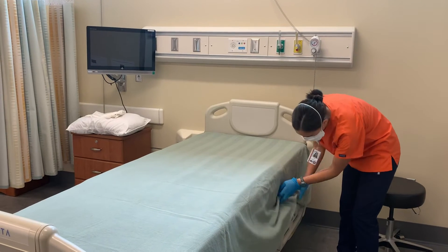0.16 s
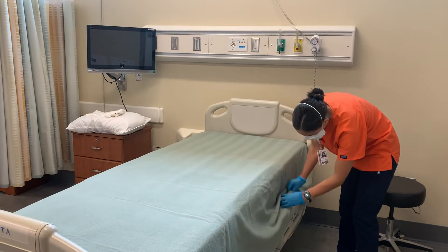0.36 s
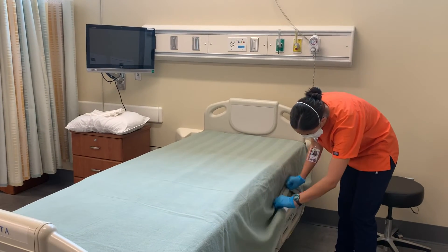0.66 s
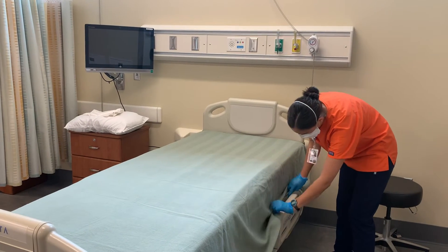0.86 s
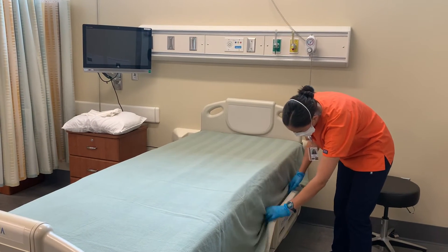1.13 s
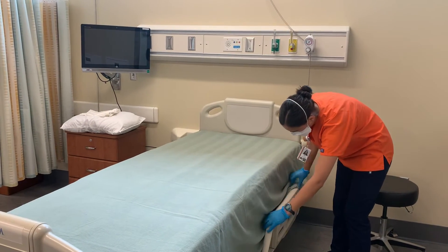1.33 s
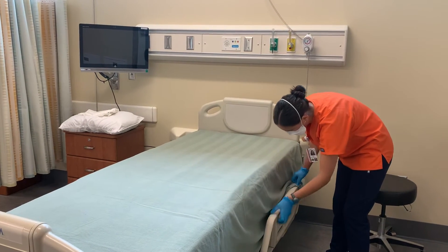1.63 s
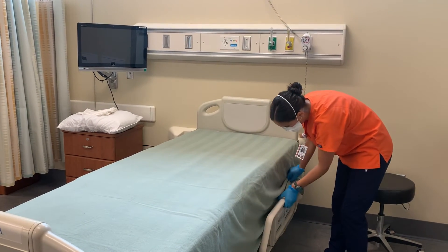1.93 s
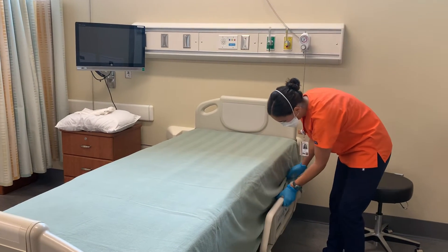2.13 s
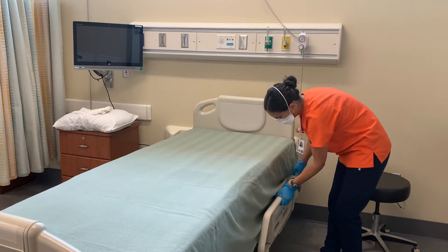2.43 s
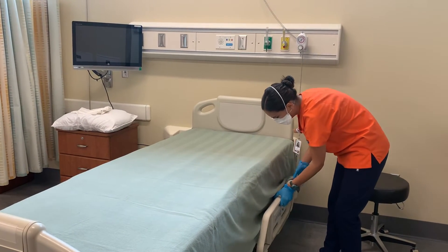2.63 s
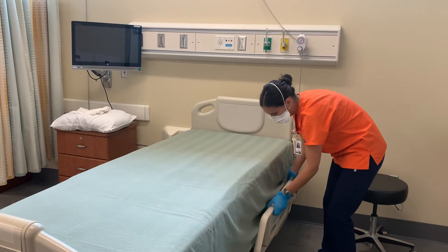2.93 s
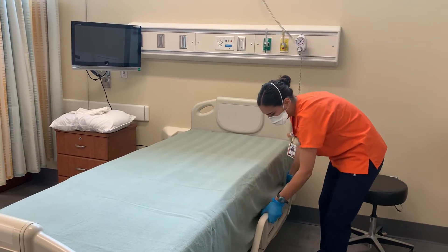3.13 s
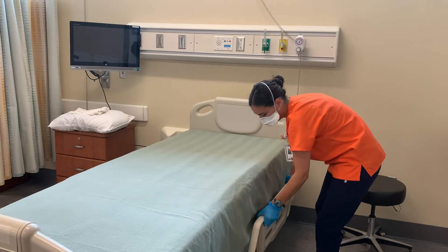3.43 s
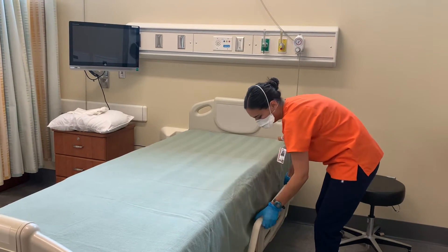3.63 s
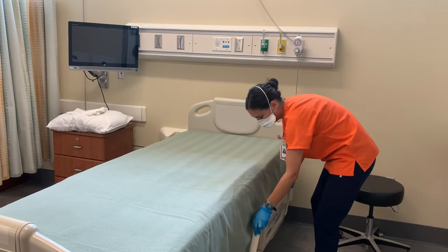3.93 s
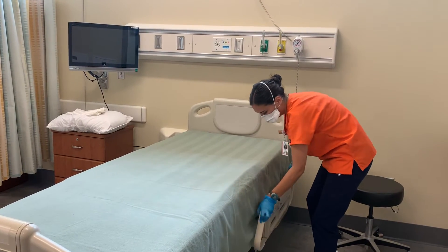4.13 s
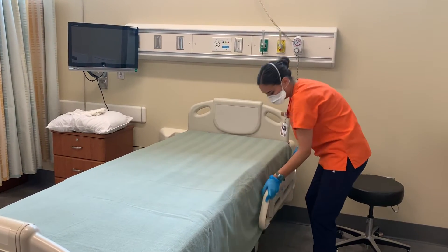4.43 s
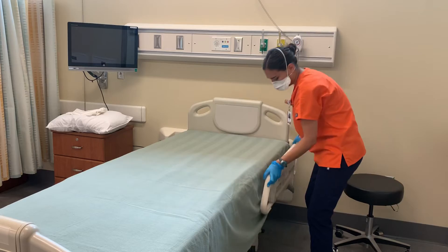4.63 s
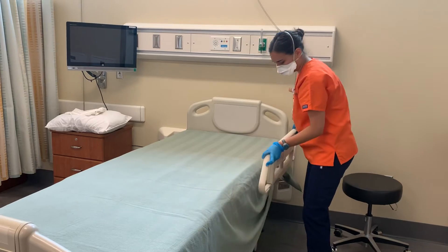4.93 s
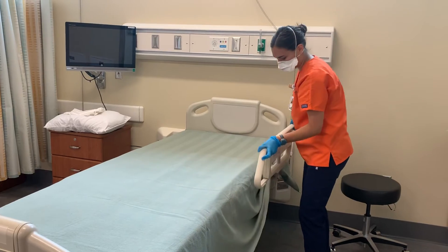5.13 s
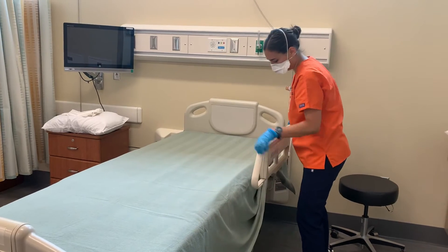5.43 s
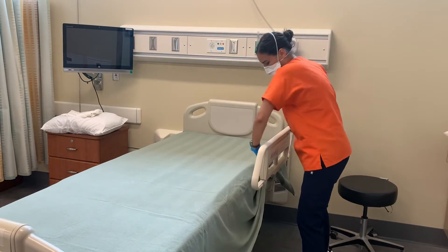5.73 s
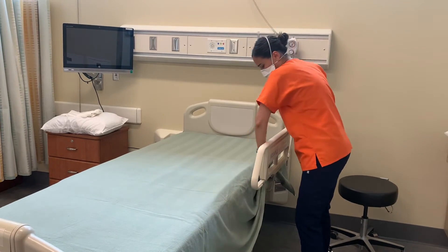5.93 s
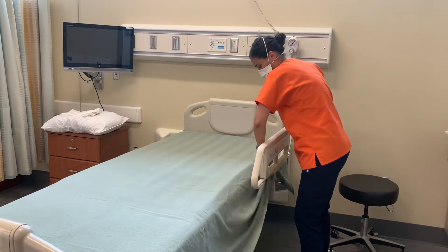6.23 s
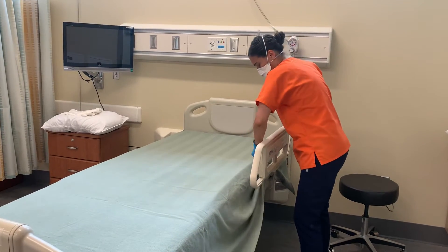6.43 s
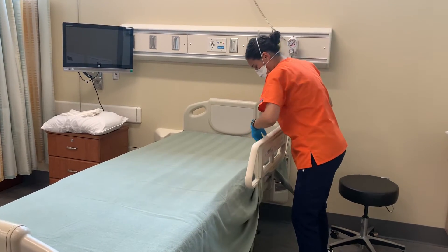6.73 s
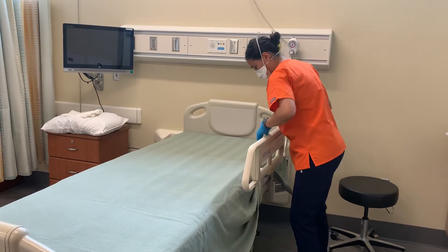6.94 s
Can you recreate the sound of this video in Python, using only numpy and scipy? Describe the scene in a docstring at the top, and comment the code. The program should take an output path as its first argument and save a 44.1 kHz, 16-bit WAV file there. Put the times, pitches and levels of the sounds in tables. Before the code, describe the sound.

A gloved worker handles a hospital bed's side rail: fabric rustles, light taps, a rattling knock at two seconds, then a heavier hollow clunk. The hinge sticks and slips in two quick dry bursts with faint scraping. Sparse clicks and small knocks come next, before the latch snaps home, by far the loudest event. Steady soft air rumble and short room reflections surround everything, picked up in stereo at moderate distance.

```python
"""A hospital bed's plastic side rail is drawn out from under the sheet and swung up, in a small ventilated room.
Ventilation (shaped noise and a whistle) runs throughout; at first cloth swishes (bursts of grainy noise) and the
rail knocks (noise bursts that ring its modes). Then the frame booms (low decaying tones), the arms scrape (tiny
random clicks) and the hinge creaks in slips. Light clicks follow, and at the end the latch snaps home and rings."""
import sys
import numpy as np
from scipy import signal
from scipy.io import wavfile

SR = 44100
rng = np.random.default_rng(int(sys.argv[2]) if len(sys.argv) > 2 else 0)


def log_audio(samples):
    """Write samples as a 16-bit WAV file to the path given in sys.argv[1]."""
    # one column per channel
    frames = np.atleast_2d(samples).T
    # limit to full scale, then quantise
    limited = np.clip(frames, -1, 1)
    pcm = np.round(limited * 32767).astype(np.int16)
    wavfile.write(sys.argv[1], SR, pcm)


N = 311787

EVENT_T = np.arange(int(.25 * SR)) / SR   # time within one short sound, s


def amp(db):
    """Turn decibels into gain."""
    return 10 ** (np.asarray(db) / 20)


def unit_energy(x):
    """Scale to an energy of one, averaged over the channels."""
    return x / np.sqrt(np.mean(np.sum(x ** 2, axis=-1)) + 1e-30)


def unit_rms(x):
    """Scale a full-length sound to an rms of one."""
    return np.sqrt(N) * unit_energy(x)


def at_hz(points, hz):
    """Read a table between its points, on a log-frequency axis."""
    f, value = np.transpose(points)
    return np.interp(np.log(hz), np.log(f), value)


def level_curve(points):
    """Gain that follows a table of (time_s, level_db)."""
    return amp(np.interp(np.arange(N) / SR, *np.transpose(points)))


def band(x, low, high, order=2):
    """Keep only the sound between two pitches (Butterworth band-pass)."""
    return signal.sosfilt(signal.butter(order, [low, high], "band", fs=SR, output="sos"), x)


def resonance(x, hz, width):
    """Ring one mode: a two-pole resonance with a gain of about one at its peak."""
    r = np.exp(-np.pi * width / SR)
    feed = np.array([1, 0, -1]) * (1 - r * r) / 2
    return signal.lfilter(feed, [1, -2 * r * np.cos(2 * np.pi * hz / SR), r * r], x)


def drift(rate):
    """Random wander that picks a new target `rate` times a second."""
    knots = rng.standard_normal(int(rate * N / SR) + 2)
    return np.interp(np.arange(N) * rate / SR, np.arange(len(knots)), knots)


def add(track, s, sound):
    """Mix a sound into a track at time s."""
    start = int(s * SR)
    track[start:start + len(sound)] += sound[:N - start]


# how alike left and right are in sound that fills the room: pitch_hz, likeness (-1 to 1)
EAR_LIKENESS = [(60, 0.93), (130, 0.92), (300, 0.62), (650, 0.3), (1400, 0.11), (3000, 0.063),
                (7000, -0.094), (15000, -0.23)]


def diffuse_bands(size):
    """Half-octave bands (Hz, stereo noise) that are most alike in both ears in the bass."""
    edges = 22.5 * 2 ** np.arange(0, 9.6, .5)
    white = rng.standard_normal((2, 2, size))
    for k, (low, high) in enumerate(zip(edges, edges[1:])):
        mid, side = band(white[k % 2], low, high)
        hz = np.sqrt(low * high)
        alike = np.clip(at_hz(EAR_LIKENESS, hz), -1, 1)
        yield hz, np.sqrt(1 + alike) * mid + np.sqrt(1 - alike) * side * [[1], [-1]]


def coloured(spectrum):
    """Stereo noise of a given spectrum, rms one."""
    return unit_rms(sum(amp(at_hz(spectrum, hz)) * noise for hz, noise in diffuse_bands(N)))


def narrow_noise(hz, width, channels):
    """Noise sent twice through one resonance gives a fuzzy tone, rms one."""
    noise = rng.standard_normal((channels, N))
    return unit_rms(resonance(resonance(noise, hz, width), hz, width))


# how long the room rings: pitch_hz, time to fall by 60 dB (t60_s)
ROOM_DECAY = [(100, 0.73), (300, 0.47), (1000, 0.41), (3000, 0.22), (6000, 0.28), (12000, 0.16)]
REFLECT_ABOVE_HZ = 350   # longer waves bend round the bed instead of bouncing off it


def room_response(direct_db, early_db, early_s, tail_db):
    """Direct sound, a quick cloud of reflections from bed and wall, and the room's longer tail."""
    t = np.arange(int(.6 * SR)) / SR
    tail = 0
    for hz, noise in diffuse_bands(len(t)):
        fade = (1 - np.exp(-t / 0.00076)) * amp(-60 * t / at_hz(ROOM_DECAY, hz))
        tail = tail + np.sqrt(hz) * unit_energy(noise * fade)
    early = 0
    for hz, noise in diffuse_bands(len(t)):
        reflected = hz / np.hypot(hz, REFLECT_ABOVE_HZ)
        early = early + np.sqrt(hz) * reflected * unit_energy(noise * np.exp(-t / early_s))
    response = amp(early_db) * unit_energy(early) + amp(tail_db) * unit_energy(tail)
    # the rail stands a little to the right: the left ear hears it one sample later
    response[0, 1] += amp(direct_db)
    response[1, 0] += amp(direct_db)
    return response


def in_room(x, response):
    """Play a source through the room, heard by two ears."""
    return signal.fftconvolve(x[None], response, axes=1)[:, :N]


# spectrum of the duct rumble: pitch_hz, relative level_db per Hz
RUMBLE_SPECTRUM = [(15, -51), (25, -45), (40, -13.5), (60, 6), (77, -9.5), (87, 0.5), (128, -5.5),
                   (189, -7.5), (288, -17.5), (361, -20), (487, -26.5), (591, -72), (900, -43), (1170, -59),
                   (1980, -120)]
# spectrum of the faint air hiss: pitch_hz, relative level_db per Hz
HISS_SPECTRUM = [(400, -15), (620, 1), (850, 24.5), (1500, 19.5), (2700, 24.5), (3100, -19), (3700, -47),
                 (4700, -3), (5600, -3), (8000, -57), (16000, -25)]
# narrow bands of the ventilation: (pitch_hz, width_hz)
DRONE_BAND, WHINE_BAND, GRILLE_BAND = (61, 24), (2824, 130), (4720, 600)


def ventilation(rumble_db, hiss_db, whine_db, whistle_db, grille_db, drone_db):
    """Duct rumble, drone and a fuzzy whine around a steady whistle, stronger on the right; plus faint hiss."""
    rumble = amp(rumble_db) * coloured(RUMBLE_SPECTRUM)
    drone = amp(drone_db) * narrow_noise(*DRONE_BAND, channels=1)
    whine = amp(whine_db) * narrow_noise(*WHINE_BAND, channels=2)
    grille = amp(grille_db) * narrow_noise(*GRILLE_BAND, channels=2)
    whistle = amp(whistle_db) * np.sin(2 * np.pi * WHINE_BAND[0] * np.arange(N) / SR)
    left_right = amp([[-1.1], [.9]])
    return (rumble + drone + whine + grille + whistle) * left_right + amp(hiss_db) * coloured(HISS_SPECTRUM)


FOLDS_PER_S, FOLD_S, FOLD_DB = 60, .005, 3   # buckling folds: rate in each band, decay, size over the steady rub
CREASES_PER_S, CREASE_BAND_HZ = 110, (1500, 6500)   # tiny snaps of the creases


def friction(spectrum, grain_db, flutter_db, patchy_db, crackle_db):
    """Threads catch and let go on folds that slide unevenly and buckle band by band; a few creases snap."""
    grain = amp(grain_db * drift(700) + flutter_db * drift(28))
    folds = 0
    for hz, noise in diffuse_bands(N):
        starts = (rng.random(N) < FOLDS_PER_S / SR) * rng.random(N)
        buckles = signal.lfilter([1], [1, -np.exp(-1 / (FOLD_S * SR))], starts + 1e-18)
        patches = amp(at_hz(spectrum, hz) + patchy_db * drift(35))
        folds = folds + patches * (1 + amp(FOLD_DB) * buckles) * noise[0]
    snaps = (rng.random(N) < CREASES_PER_S / SR) * rng.standard_normal(N)
    crackle = band(snaps + 1e-18, *CREASE_BAND_HZ)
    return unit_rms(unit_energy(grain * folds) + amp(crackle_db) * unit_energy(crackle))


# every stroke swells, sags as the hand slows, and dies away
STROKE_ATTACK_S, STROKE_ATTACK_SHARE = 0.01, .22   # shortest swell, and share of the length added to it
STROKE_SAG_DB_PER_S, STROKE_RELEASE_S = 20.5, 0.02


def stroke(start, length):
    """Envelope of one stroke: the hand gathers speed, more gently in long strokes, then slows and lets go."""
    age = np.maximum(np.arange(N) / SR - start, 0)
    attack = STROKE_ATTACK_S + STROKE_ATTACK_SHARE * length
    swell = 1 - np.exp(-np.minimum(age / attack, 10) ** 2)
    sag = amp(-STROKE_SAG_DB_PER_S * np.minimum(age, length))
    release = np.exp(-np.maximum(age - length, 0) / STROKE_RELEASE_S)
    return swell * sag * release


# strokes of the hands over the cloth: start_s, length_s, rub_db (clothes rubbing), slide_db (sheet on plastic)
CLOTH_STROKES = [(0.06, 0.24, -75, -77), (0.28, 0.19, -62.5, -68.5), (0.46, 0.19, -66, -73),
                 (0.717, 0.16, -64.5, -65.5), (0.865, 0.13, -61, -65), (1.142, 0.23, -63.5, -80),
                 (1.33, 0.09, -65, -64), (1.624, 0.092, -54, -56), (1.706, 0.095, -57, -43.5),
                 (1.782, 0.11, -58.5, -43.5), (2.01, 0.04, -78, -73), (2.62, 0.05, -86, -75.5),
                 (2.744, 0.094, -63, -62), (2.834, 0.087, -63, -49), (2.916, 0.11, -60, -50.5),
                 (3.04, 0.29, -58.5, -79), (3.488, .15, -60, -74), (3.643, .11, -59, -59),
                 (3.745, 0.17, -66.5, -80), (5.376, 0.08, -63.5, -76), (5.594, 0.28, -67, -77),
                 (5.93, 0.11, -62.5, -69), (6.156, 0.13, -63.5, -70.5)]
# faint rustle of clothes between the strokes, almost none while standing still: time_s, level_db
CLOTHES_RUSTLE = [(0, -73), (2.2, -68), (2.45, -82), (2.901, -72), (3.9, -71.5), (4.1, -84), (4.25, -70),
                  (4.5, -94), (5.3, -76), (5.9, -71.5), (6.4, -82.5)]
# spectrum of clothes rubbing: pitch_hz, relative level_db per Hz
RUB_SPECTRUM = [(150, -10), (300, 25), (650, -4.5), (1300, 14.5), (2600, 14.5), (5000, 14.5), (7000, 3),
                (10000, 1), (16000, 10)]
# spectrum of the sheet sliding on plastic: pitch_hz, relative level_db per Hz
SLIDE_SPECTRUM = [(200, -22), (1000, -23), (2500, -12), (4700, -3.5), (6500, -4), (8500, -5), (11000, 1),
                  (15500, -4.5)]


def cloth():
    """Clothes rub softly; the sheet hisses where it is dragged over the rail."""
    rub, slide = level_curve(CLOTHES_RUSTLE) ** 2, 0
    for start, length, rub_db, slide_db in CLOTH_STROKES:   # overlapping strokes add in power
        power = stroke(start, length) ** 2
        rub = rub + amp(rub_db) ** 2 * power
        slide = slide + amp(slide_db) ** 2 * power
    clothes = np.sqrt(rub) * friction(RUB_SPECTRUM, grain_db=2.6, flutter_db=1.6, patchy_db=2.8, crackle_db=-12.0)
    sheet = np.sqrt(slide) * friction(SLIDE_SPECTRUM, grain_db=3.0, flutter_db=1.6, patchy_db=3.5, crackle_db=-20.0)
    return clothes + sheet


# ringing of the rail and its metal linkage: pitch_hz, width_hz, relative level_db
RAIL_RING = [(1183, 170, 2.5), (1449, 130, 4), (1626, 36, 0.5), (2074, 63, 3.5), (2490, 90, 4.5),
             (2680, 190, 8.5), (3160, 115, 3.5), (4210, 83, 3), (4730, 580, 8.5), (6570, 970, 7.5),
             (10260, 1000, 13), (11600, 1100, 8)]
MODE_SHIFT_OCTAVES = .04   # grip and load detune the rail's modes from one contact to the next
# low resonances of the bed's frame: pitch_hz, width_hz, relative level_db
FRAME_RING = [(142, 76, 1), (177, 31, -2.5), (229, 56, 2.5), (314, 59, 1), (413, 58, -3), (495, 90, -14)]
FRAME_TILT = 0.29   # dB per octave that the frame's ring leans to the bass for each dB of weight
# the six registers (body, hollow, low mid, high mid, treble, top): low_hz, high_hz
REGISTERS = [(120, 574), (630, 1028), (1080, 1860), (2000, 3696), (3950, 7500), (9200, 13500)]
# share of a contact's weight and of its edge that each register gets
WEIGHT_SHARE, EDGE_SHARE = (1, .9, .5, 0, 0, 0), (0, 0, 0, 0, .5, 1)


def ring_rail(chatter, ring_db, scatter_db):
    """Every point of contact favours other modes of the rail and detunes them a little."""
    shell = chatter
    for hz, width, db in RAIL_RING:
        gain = amp(ring_db + db + scatter_db * rng.standard_normal())
        shifted_hz = hz * 2 ** (MODE_SHIFT_OCTAVES * rng.standard_normal())
        shell = shell + gain * resonance(chatter, shifted_hz, width)
    return shell


def ring_frame(sway, weight_db):
    """The frame's low modes ring; a heavier touch leans them to the bass."""
    body = 0
    for hz, width, db in FRAME_RING:
        octaves_up = np.log2(hz / FRAME_RING[0][0])
        body = body + amp(db - FRAME_TILT * weight_db * octaves_up) * unit_energy(resonance(sway, hz, width))
    return body


def blows(rows, colour_db, ring_db, bite, body_swell_s, scatter_db):
    """Each contact builds up, chatters and rings the rail; the heavy frame answers more slowly."""
    track = np.zeros(N)
    filters = [signal.butter(4, zone, "band", fs=SR, output="sos") for zone in REGISTERS]
    for s, level_db, weight_db, edge_db, contact_s in rows:
        chatter, sway = rng.standard_normal((2, len(EVENT_T)))
        age = EVENT_T / max(contact_s, 1 / 2 ** 11)
        chatter = chatter * (1 - np.exp(-bite * age)) ** 2 * np.exp(-age) + 1e-18
        sway = sway * EVENT_T ** 2 * np.exp(-EVENT_T / body_swell_s)
        shell = ring_rail(chatter, ring_db, scatter_db)
        body = ring_frame(sway, weight_db)
        # how heavy and sharp the touch is sets the level of each register
        zone_db = np.array(colour_db) + weight_db * np.array(WEIGHT_SHARE) + edge_db * np.array(EDGE_SHARE)
        # the frame fills the lowest register, the rail all others
        parts = [signal.sosfilt(sos, shell if k else body) for k, sos in enumerate(filters)]
        sound = sum(amp(db) * unit_energy(part) for db, part in zip(zone_db, parts))
        add(track, s - contact_s / bite, amp(level_db) * sound)   # begins early to allow for the build-up
    return track


def along_rail(rows, count):
    """Deal contacts in turn to a few places on the rail, so that each place can have its own reflections."""
    return [rows[k::count] for k in range(count)]


# quick brushes of a glove on the sheet: time_s, level_db, edge_db (lifts the highs)
GLOVE_BRUSHES = [(1.172, -37, 2), (1.573, -41.5, 10), (2.118, -40.5, -3), (2.183, -25.5, 0),
                 (2.757, -38.5, -4), (3.157, -30, -4), (3.267, -25.5, -17), (3.470, -32.5, 8),
                 (3.875, -45.5, 3.5), (4.133, -33.5, -11)]
# colour of a brush: level_db in each of the six registers
BRUSH_COLOUR = [3.5, -9.5, -2, -0.5, 3.5, 2]
BRUSH_CONTACT_S = 0.013


def brushes():
    """Contacts of the gloves: soft and slow."""
    return [(s, db, 0, edge, BRUSH_CONTACT_S) for s, db, edge in GLOVE_BRUSHES]


# the arms of the rail scrape in their guides as it swings, harder where the hinge sticks: time_s, level_db
ARM_SCRAPE = [(3.44, -120), (3.51, -56.5), (3.63, -59), (3.78, -63), (3.93, -65), (4.08, -69.5),
              (4.17, -60), (4.31, -59), (4.38, -69.5), (4.5, -120)]
SCRAPE_GRAINS_PER_S, SCRAPE_GRAIN_DB, SCRAPE_BAND_HZ = 520, 3.2, (650, 4000)


def scrape(ring_db, flutter_db, bunching_db):
    """Tiny catches come in bunches as the arms slide; the moving contact favours one mode after another."""
    sizes = amp(SCRAPE_GRAIN_DB * np.minimum(rng.exponential(1, N), 4)) * rng.choice([-1, 1], N)
    caught = rng.random(N) < SCRAPE_GRAINS_PER_S * amp(bunching_db * drift(45)) / SR
    grains = sizes * caught + 1e-18
    shell = grains
    for hz, width, db in RAIL_RING:
        shell = shell + amp(ring_db + db + flutter_db * drift(25)) * resonance(grains, hz, width)
    return level_curve(ARM_SCRAPE) * unit_rms(band(shell, *SCRAPE_BAND_HZ))


# booms of the bed frame: time_s, level_db, pitch_hz
FRAME_BOOMS = [(1.864, -37, 241), (1.875, -44.5, 319), (2.207, -30.5, 122), (2.293, -37, 219),
               (3.294, -33.5, 159), (3.328, -30.5, 296.4), (3.359, -31.5, 215), (3.419, -39, 172),
               (3.496, -36, 211), (3.834, -38.5, 194), (3.915, -40, 297), (3.925, -36, 246),
               (3.95, -40, 289), (3.975, -45, 250), (4.426, -36, 195), (4.445, -44, 216), (4.5, -39, 193),
               (5.115, -41, 346), (5.25, -45, 347), (5.275, -44, 275), (5.305, -44, 262), (5.735, -42, 380),
               (5.835, -45, 342), (6.932, -22.5, 426), (6.936, -28, 335), (6.955, -30, 178)]
BOOM_OVERTONE_RATIO = (1.355, 1.8)   # range of the overtone's pitch over the boom's


def frame_booms(swell_s, t60, overtone_db):
    """The loaded frame swings briefly at a low pitch; a hollow overtone dies sooner."""
    track = np.zeros(N)
    swell, decay = 1 - np.exp(-EVENT_T / swell_s), amp(-60 * EVENT_T / t60)
    for s, db, hz in FRAME_BOOMS:
        phase = 2 * np.pi * hz * EVENT_T
        overtone = amp(overtone_db) * decay * np.sin(rng.uniform(*BOOM_OVERTONE_RATIO) * phase)
        add(track, s - swell_s, amp(db) * swell * decay * (np.sin(phase) + overtone))
    return track


# loose parts tick at random while the rail is moved: start_s, end_s, level_db
LOOSE_PARTS = [(0.15, 0.66, -50), (3.66, 3.82, -38), (3.85, 4.14, -45), (4.689, 5.05, -53.5)]
TICK_GAP_S, TICK_SPREAD_DB, TICK_CONTACT_S = .05, 1, 0.00306


def ticks():
    """Contacts of loose parts: one at a random moment in each short slot of a movement."""
    rows = []
    for start, end, db in LOOSE_PARTS:
        for slot in np.arange(start, end, TICK_GAP_S):
            s = slot + TICK_GAP_S * rng.random()
            rows.append((s, db + TICK_SPREAD_DB * rng.standard_normal(), 0, 0, TICK_CONTACT_S))
    return rows


# the rail knocks on its stops and linkage: time_s, level_db, weight_db (lifts the lows), edge_db (lifts the highs)
RAIL_KNOCKS = [(0.121, -44.5, -8, 10), (0.879, -33, -10.5, -1), (1.146, -37.5, -13, 8),
               (1.215, -40, 6.5, 7), (1.251, -37, 6, 7), (1.646, -31, 3, 7), (1.693, -35.5, 9.5, 2),
               (1.868, -41.5, 11.5, -8), (2.192, -23.5, -1, 19), (2.201, -22, 5.5, 18),
               (2.227, -30, 8.5, -8), (2.257, -29, 5, -17), (2.532, -39.5, -7.5, 3.5),
               (2.672, -42.5, 7.5, -18), (3.103, -41, 2, -18), (3.115, -36, -5.5, -5),
               (3.157, -32.5, 3.5, 2), (3.18, -37, 3, 3), (3.202, -34.5, 0, 7), (3.273, -16.5, -1.5, -8),
               (3.282, -22, 10.5, 6), (3.301, -19, 5, -0.5), (3.476, -24.5, 5, 0), (3.713, -36, -5, 8),
               (3.828, -31, -3, -2), (3.904, -36.5, 9, 1), (3.963, -36, 2, -15), (4.021, -40, -2.5, -22),
               (4.111, -42, -0.5, -12), (4.162, -37, 0, -8), (4.476, -28, -8, -6), (4.487, -21.5, -1.5, -9),
               (4.694, -47, 4.5, -12), (4.84, -44, -3, 5), (5.102, -30, 1, -7.5), (5.116, -36, 9, -10),
               (5.235, -28, 2, -2), (5.29, -40.5, 9, -4), (5.39, -37, 4, 3), (5.465, -35, -4.5, -19),
               (5.531, -28, -3.5, -13), (5.704, -33, 3.5, -21), (5.726, -28, 0, 2), (5.749, -30, 2, 6),
               (5.822, -20, -9.5, 0), (5.839, -31.5, -0.5, -14), (6.042, -28.5, -1, -11),
               (6.474, -29.5, -8.5, 5.5), (6.495, -25, -4, -8), (6.649, -26.5, -3, -12),
               (6.815, -26.5, -2, -13)]
# colour of a knock or tick: level_db in each of the six registers
KNOCK_COLOUR = [3.3, -5.5, -1, 0, -6, -14.5]
KNOCK_CONTACT_S, CONTACT_PER_WEIGHT = .0042, .45   # contact at zero weight; dB of lengthening per dB of weight


def knocks():
    """Contacts of the rail: light ones are short clicks, heavy ones longer clunks."""
    rows = []
    for s, db, weight, edge in RAIL_KNOCKS:
        rows.append((s, db, weight, edge, KNOCK_CONTACT_S * amp(CONTACT_PER_WEIGHT * weight)))
    return rows


# the hinge sticks and lets go as the rail swings: time_s, level_db, edge_db (lifts the highs)
HINGE_SLIPS = [(3.5553, -18, -2), (3.568, -18, 3.5), (3.589, -21, 3), (3.61, -23, 3), (3.628, -26, -5),
               (3.641, -24, -4), (3.652, -28.5, -4), (3.68, -33, -4), (3.775, -36, -6), (4.058, -40, 5),
               (4.194, -18, 1.5), (4.207, -19, -4), (4.228, -22, -4), (4.246, -22, -3), (4.261, -25.5, 3),
               (4.277, -27, -3), (4.297, -29.5, -4), (4.318, -30.5, -5), (4.343, -34, -6), (5.26, -22, -1)]
# colour of a slip: level_db in each of the six registers
SLIP_COLOUR = [-10.5, -16, -8, -2, -0.5, -14]
SLIP_CONTACT_S = .0018


def slips():
    """Contacts of the hinge: short and dry."""
    return [(s, db, 0, edge, SLIP_CONTACT_S) for s, db, edge in HINGE_SLIPS]


# ringing of the steel latch once it seats: pitch_hz, relative level_db, time to fall by 60 dB (t60_s)
LATCH_RING = [(1457, -5, .13), (1656, -3, .14), (2085, -5, .12), (2490, 2, .1), (2640, -1, 0.079),
              (3420, -8, .07), (4670, -3, .08), (4880, -4, .08), (6800, -8, .08), (7150, -2, 0.061)]
LATCH_SEATS_S, LATCH_RING_DB = 6.918, -33


def latch_ring(swell_s):
    """The steel latch rings on briefly after it seats."""
    track = np.zeros(N)
    modes = 0
    for hz, db, t60 in LATCH_RING:
        tone = np.sin(2 * np.pi * (hz * EVENT_T + rng.random()))
        modes = modes + amp(db - 60 * EVENT_T / t60) * tone
    swell = 1 - np.exp(-EVENT_T / swell_s)
    add(track, LATCH_SEATS_S - swell_s, amp(LATCH_RING_DB) * swell * modes)
    return track


# a softer noise, then contacts of the latch as it drops in, seats and rattles:
# time_s, level_db, weight_db (lifts the lows), edge_db (lifts the highs), contact_s
LATCH_CONTACTS = [(6.902, -18, 5, 0, 0.019), (6.913, -6.5, 0, 2, 0.0072),
                  (6.9164, -1.5, -3.5, 9.5, 0.00089), (6.9187, 4.5, -2, -1, 0.00083),
                  (6.9202, -2.5, 6, -5, 0.0018), (6.933, -12, 7, 0, 0.002), (6.946, -12, 5, 2, 0.0019)]
# colour of the latch: level_db in each of the six registers
LATCH_COLOUR = [-8, -16.5, -7, -1.7, -0.7, -6]


def latch_snap():
    """Short bursts of noise ring the rail as the latch snaps home; each one radiates its own way."""
    total = np.zeros((2, N))
    for contact in LATCH_CONTACTS:
        snap = blows([contact], LATCH_COLOUR, ring_db=-5.5, bite=3.53, body_swell_s=0.0056, scatter_db=3.0)
        response = room_response(direct_db=-6.5, early_db=-4.5, early_s=0.0062, tail_db=-7.5)
        total += amp([[.9], [-.9]]) * in_room(snap, response)   # left and right level, dB
    return total


def scene():
    """Rail, hinge, latch and cloth each reach the ears by paths of their own, over the ventilation."""
    air = ventilation(rumble_db=-55.0, hiss_db=-77.5, whine_db=-80.0, whistle_db=-79.5, grille_db=-83.0, drone_db=-58.0)
    cloth_path = room_response(direct_db=-3.5, early_db=-5.5, early_s=0.0057, tail_db=-6.5)
    handling = in_room(cloth(), cloth_path)

    gloves = blows(brushes(), BRUSH_COLOUR, ring_db=-15.0, bite=3.0, body_swell_s=0.0034, scatter_db=0.0)
    arms = scrape(ring_db=-2.0, flutter_db=5.0, bunching_db=4.5)
    handling += in_room(gloves + arms, room_response(direct_db=-4.0, early_db=-5.0, early_s=0.005, tail_db=-6.0))

    tones = frame_booms(swell_s=0.00464, t60=0.098, overtone_db=-8.0) + latch_ring(swell_s=0.00119)
    handling += in_room(tones, room_response(direct_db=-1.5, early_db=-9.0, early_s=0.0074, tail_db=-6.0))

    for contacts in along_rail(knocks() + ticks(), count=5):
        rail = blows(contacts, KNOCK_COLOUR, ring_db=-3.5, bite=1.6, body_swell_s=0.006, scatter_db=4.0)
        handling += in_room(rail, room_response(direct_db=-2.5, early_db=-4.0, early_s=0.0077, tail_db=-3.5))
    for contacts in along_rail(slips(), count=2):
        hinge = blows(contacts, SLIP_COLOUR, ring_db=-8.0, bite=2.5, body_swell_s=0.0057, scatter_db=4.0)
        handling += in_room(hinge, room_response(direct_db=-4.0, early_db=-3.5, early_s=0.008, tail_db=-2.0))
    handling += latch_snap()
    return handling * amp([[-.4], [.4]]) + air   # the handling leans slightly to the right


MIC_HISS_DB, CUTOFF_HZ = -82, 15900


def record(dry):
    """The microphone adds a faint steady hiss; the top is cut steeply."""
    heard = dry + amp(MIC_HISS_DB) * rng.standard_normal(dry.shape)
    return signal.sosfilt(signal.ellip(10, .1, 80, CUTOFF_HZ, fs=SR, output="sos"), heard)


dry = scene()
out = record(dry)
log_audio(out)
```